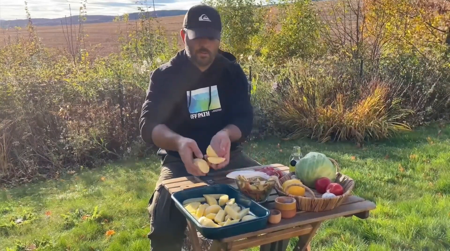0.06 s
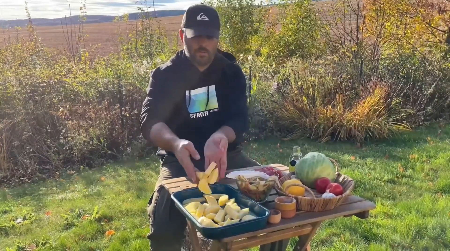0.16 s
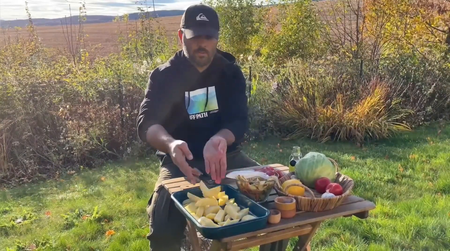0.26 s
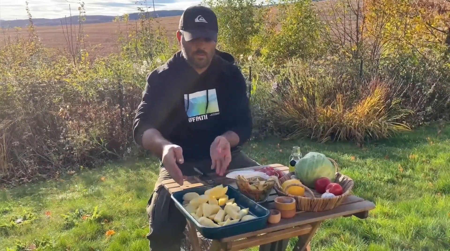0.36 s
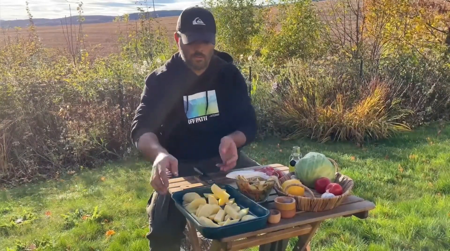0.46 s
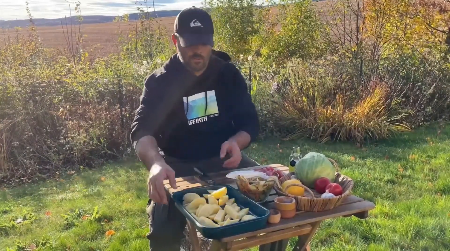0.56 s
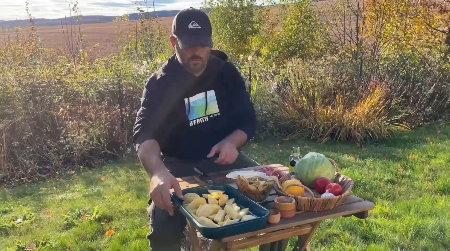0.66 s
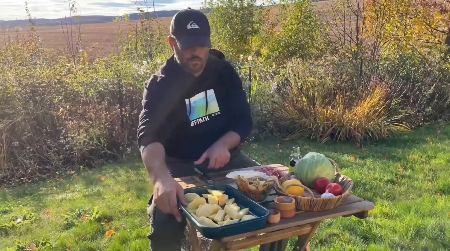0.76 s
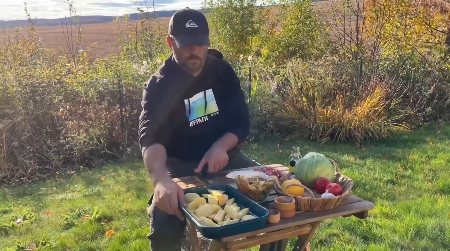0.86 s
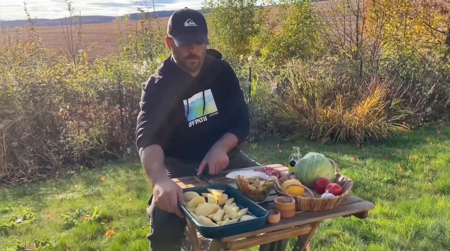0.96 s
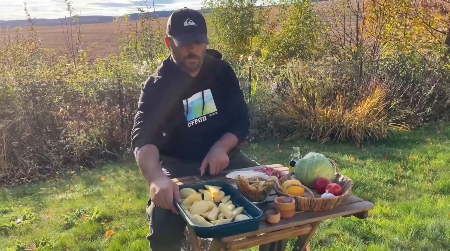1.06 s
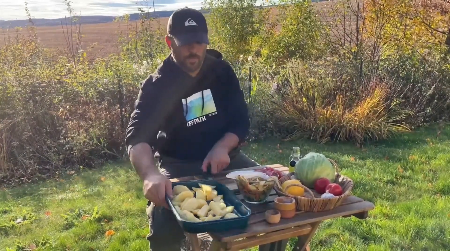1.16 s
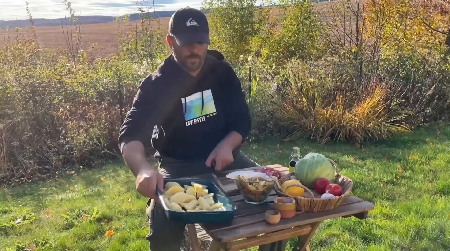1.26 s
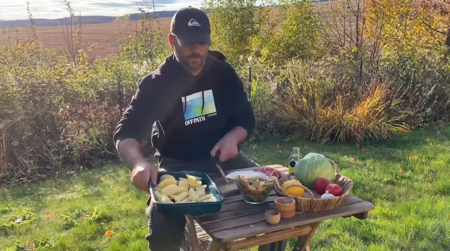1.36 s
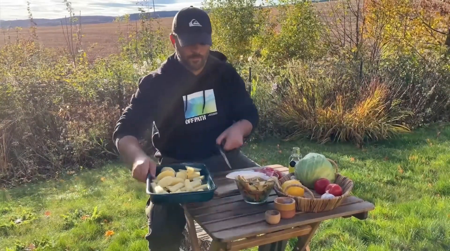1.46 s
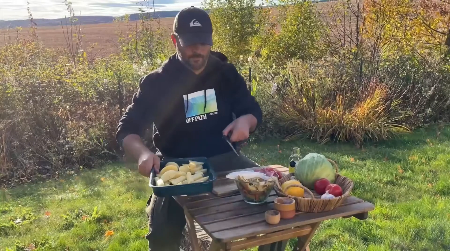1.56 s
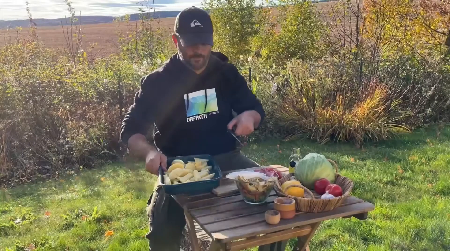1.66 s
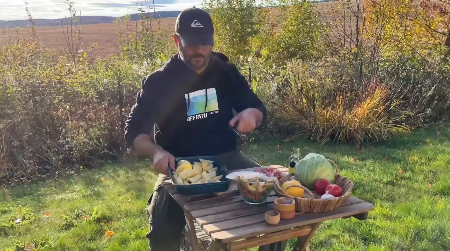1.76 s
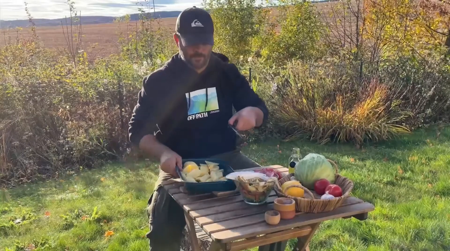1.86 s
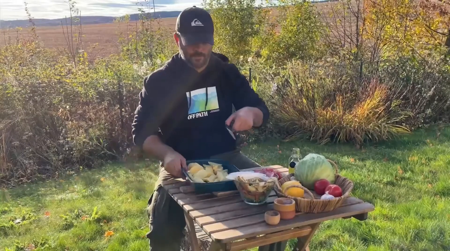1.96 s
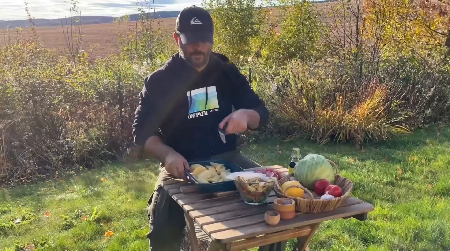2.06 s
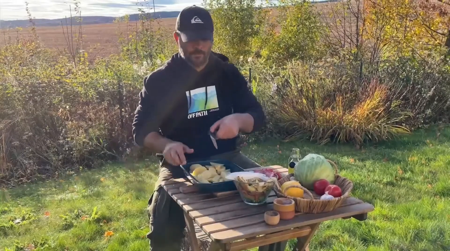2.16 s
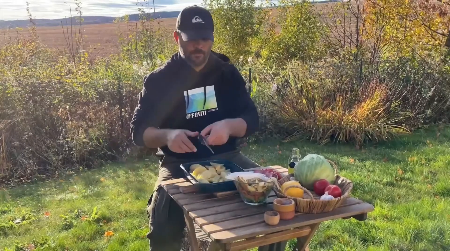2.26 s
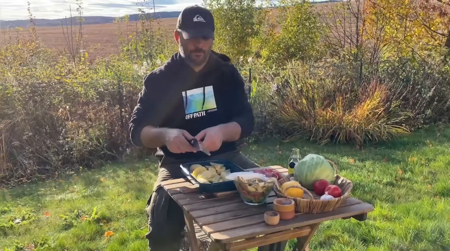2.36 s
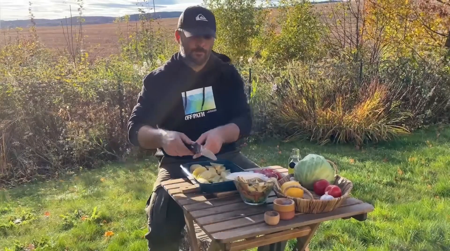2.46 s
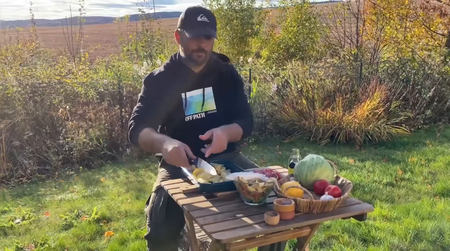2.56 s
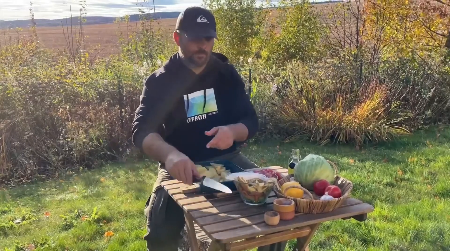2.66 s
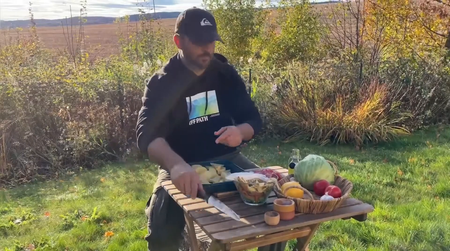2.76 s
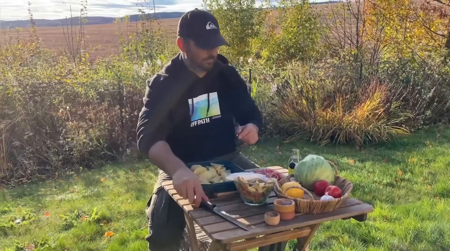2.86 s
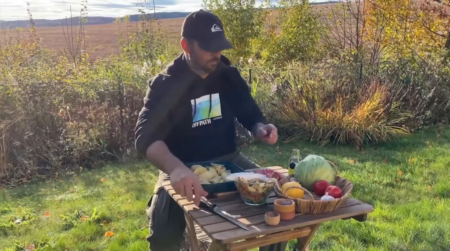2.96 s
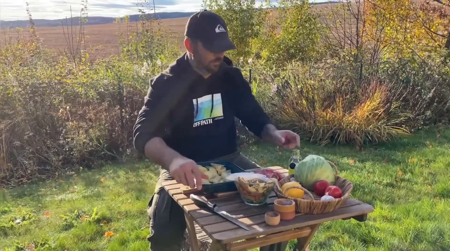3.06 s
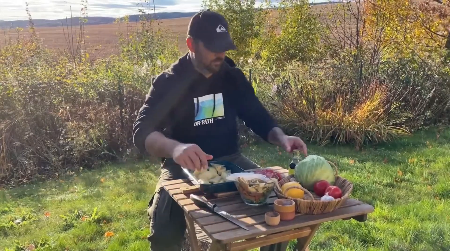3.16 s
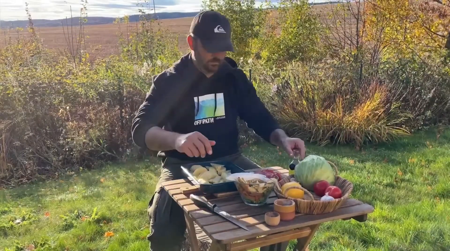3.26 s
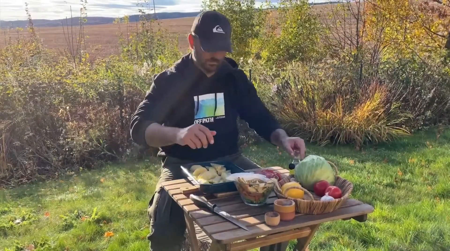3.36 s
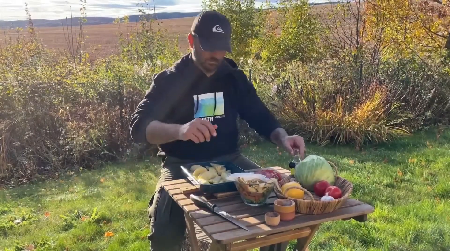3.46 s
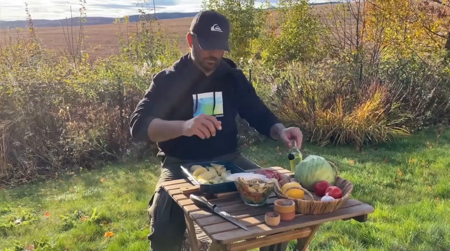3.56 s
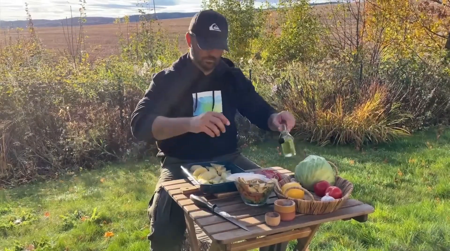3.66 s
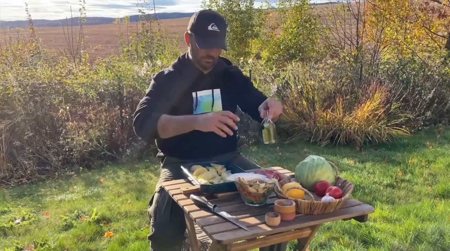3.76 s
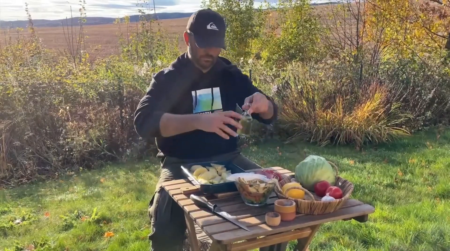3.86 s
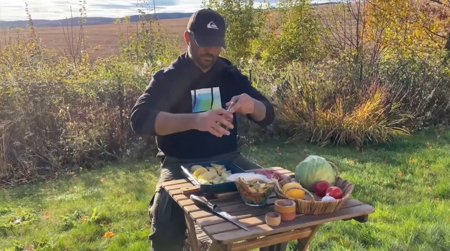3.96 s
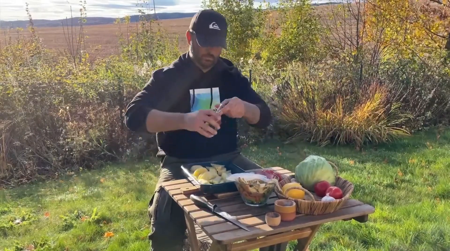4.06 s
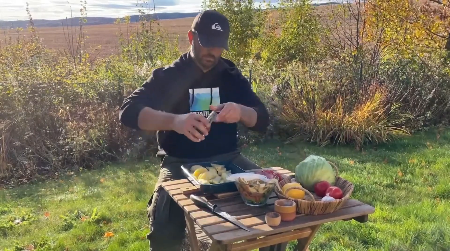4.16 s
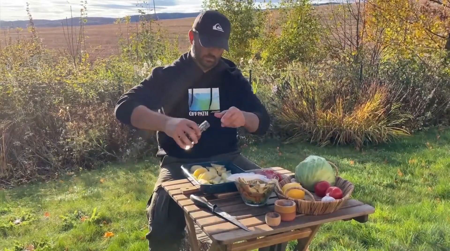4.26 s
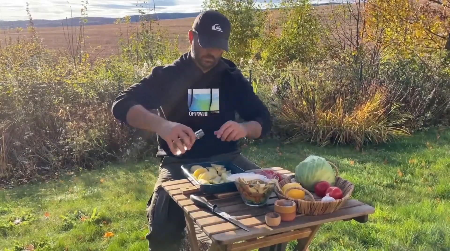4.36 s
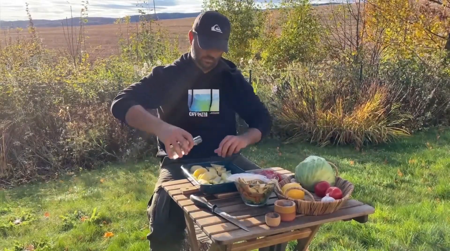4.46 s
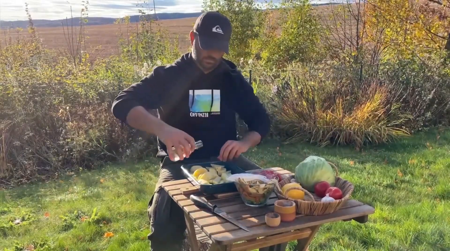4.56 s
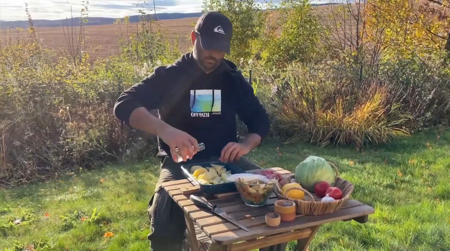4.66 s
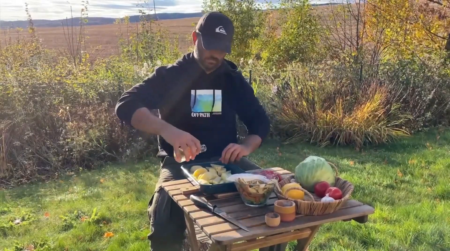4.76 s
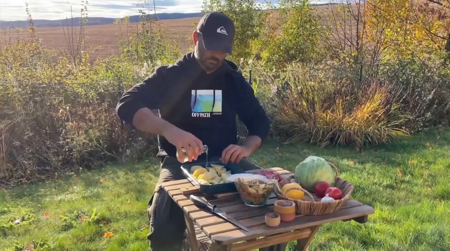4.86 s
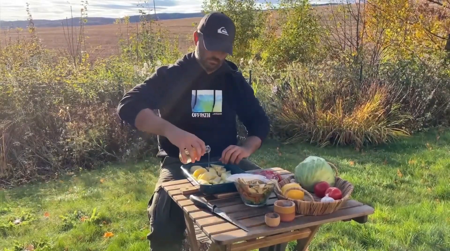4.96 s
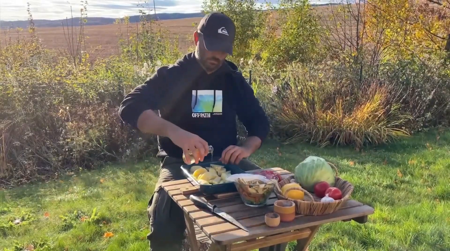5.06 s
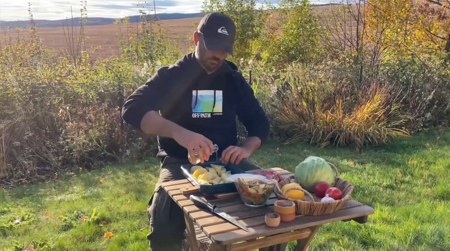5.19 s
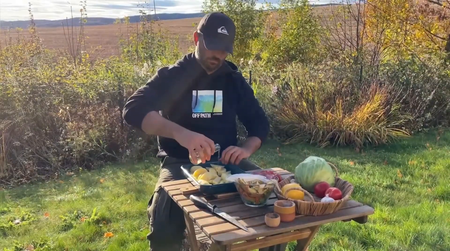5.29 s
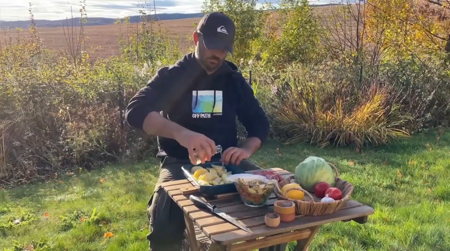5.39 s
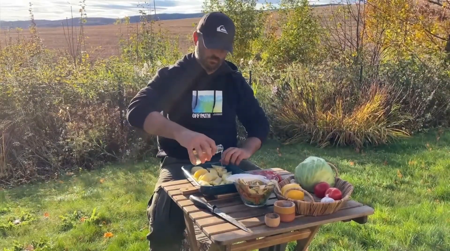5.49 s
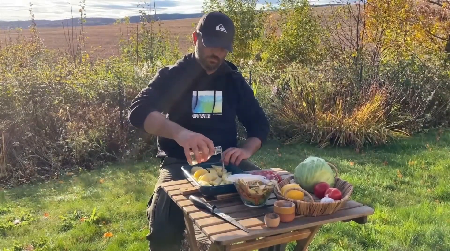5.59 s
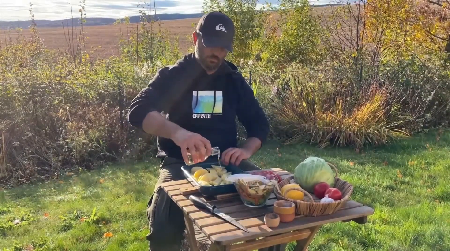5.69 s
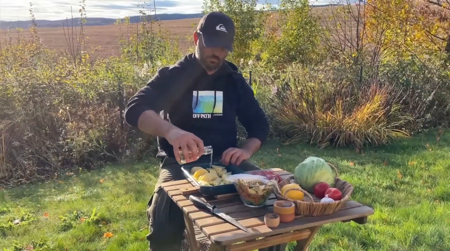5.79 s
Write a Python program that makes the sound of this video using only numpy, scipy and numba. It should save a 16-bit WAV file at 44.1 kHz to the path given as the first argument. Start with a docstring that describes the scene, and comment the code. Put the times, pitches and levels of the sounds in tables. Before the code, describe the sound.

For the first 0.8 seconds, damp potato pieces tumble into a baking tray with soft, dull thuds and a little wet rubbing. Around 1 second there is a faint swish with tiny thin squeaks, followed by light handling bumps. At about 1.75 seconds the loaded tray lands on a wooden table with a short clatter and a slight scrape. Near 2.8 seconds a knife is laid on the wood with a few sharp clicks and rocks softly to rest. Muffled bumps of hands and sleeves continue until about 4 seconds. At 4.6 seconds a hand comes down on the table with a low, dull knock. A small bottle cap clicks and rings briefly at 5.35 seconds, and a few soft bumps follow. Everything is close and outdoors, over a faint, wide hiss and a light rumble of air on the microphone.

```python
"""Potato pieces tumble softly into a baking tray, close up on a slatted wooden table in a quiet garden.
After a faint swish the tray is set down with a clatter; a knife is laid on the wood and rocks to rest.
Later a hand lands with a dull knock and a small bottle cap clicks. Hard contacts ring each object's
modes, soft ones thud for a few cycles, and scrapes are grainy noise. Handling bumps, a light air
rumble and a faint hiss lie under it all, heard through a two-port microphone."""
import sys
import numpy as np
from scipy import signal
from scipy.fft import rfft, irfft
from scipy.io import wavfile
from numba import njit

SR = 44100
rng = np.random.default_rng(int(sys.argv[2]) if len(sys.argv) > 2 else 0)


def dump_mix(stems):
    """Bounce the given channels to the path in sys.argv[1] as a 16-bit WAV at rate SR."""
    frames = np.atleast_2d(stems).T  # one column per channel
    limited = np.clip(frames, -1, 1)  # hard clip at full scale
    pcm = np.round(limited * 32767).astype(np.int16)
    wavfile.write(sys.argv[1], SR, pcm)


N = 257103
TIME = np.arange(N) / SR

# Soft bumps of hands and arms, and two low thumps as the tray lands (1.845 and 1.874 s). Each row: time in
# seconds, relative peak in dB, pitch in Hz.
BUMPS = [(0.866, -55, 300), (0.96, -53, 260), (1.069, -55, 340), (1.142, -46, 316), (1.177, -52, 269),
         (1.26, -48, 260), (1.28, -47, 263), (1.472, -49, 202), (1.49, -46, 280), (1.519, -41, 265),
         (1.593, -50, 300), (1.609, -49, 300), (1.62, -52, 240), (1.845, -32.5, 240), (1.874, -31.5, 240),
         (1.992, -33, 164), (2.027, -33.5, 164), (2.119, -46.5, 185.7), (2.204, -48.5, 214),
         (2.404, -34.5, 129.6), (2.939, -38, 127.6), (3.044, -34, 131.2), (3.269, -37, 157.3),
         (3.473, -36.5, 120.6), (3.51, -41, 149), (3.581, -39.5, 152.5), (3.704, -41, 261.2),
         (3.777, -47, 271), (4.098, -45, 219), (5.021, -42.5, 75.4), (5.135, -42, 84), (5.314, -39, 91),
         (5.532, -33, 227.7), (5.574, -46, 230), (5.655, -32.5, 169.3), (5.673, -37, 170),
         (5.789, -37, 149)]


def potatoes():
    """Damp pieces thud on each other, rub and jostle as they tumble, and slither on their wet cut faces."""
    # Landings. Each row: time in seconds, relative peak in dB, pitch in Hz.
    landings = [(0.012, -40, 520), (0.017, -41, 470), (0.024, -39, 350), (0.045, -37.5, 400),
                (0.096, -45, 380), (0.113, -41, 440), (0.127, -40.5, 320), (0.137, -43, 480),
                (0.149, -43, 330), (0.157, -38, 600), (0.163, -37, 480), (0.173, -32, 600),
                (0.184, -31, 500), (0.193, -39, 460), (0.206, -45, 560), (0.216, -44, 520),
                (0.242, -45, 540), (0.305, -38, 430), (0.319, -40, 520), (0.327, -34, 530),
                (0.367, -43, 400), (0.401, -40, 360), (0.459, -46.5, 480), (0.474, -43, 480),
                (0.484, -44, 470), (0.531, -47, 460), (0.551, -45, 460), (0.586, -51, 430),
                (0.66, -45, 370), (0.675, -49, 420), (0.706, -45, 500), (0.714, -38, 490), (0.73, -44, 460),
                (0.738, -38, 480), (0.746, -45, 480), (0.765, -42, 410)]
    # Spells of tumbling and of slipping. Each row: start and length in seconds, relative level in dB.
    tumbles = [(0.005, 0.0286, -52.5), (0.09, 0.046, -55.5), (0.155, 0.0622, -52), (0.305, 0.0293, -55),
               (0.465, 0.078, -57.5), (0.7, 0.06, -55)]
    slips = [(0.196, 0.025, -62.5), (0.28, 0.016, -64), (0.68, 0.05, -71)]
    # Tone of the dull rub and the wet slip. Each row: frequency in Hz, relative level in dB.
    rub_colour = [(170, -15), (320, 9.5), (550, 4.5), (850, -8), (1300, -26), (2300, -16.5), (6000, -34.5)]
    slip_colour = [(500, 3), (1100, 2), (1700, -6), (2600, -5), (4000, -15), (7000, -23)]
    thuds = from_db(-0.2) * soft_bumps(landings, cycles=0.85)
    rubbing = from_db(-4) * noise(rub_colour) * flicker(rate=170, depth_db=2.5)
    nudges = from_db(-6) * jostle(count=350, hz=429, spread_octaves=0.2, spread_db=3, cycles=0.91)
    wet_grain = noise(slip_colour) * flicker(rate=400, depth_db=3)
    slither = swells(slips, attack_s=0.02, release_s=0.05) * wet_grain
    return thuds + slither + swells(tumbles, attack_s=0.029, release_s=0.0688) * (rubbing + nudges)


def tray():
    """The loaded tray lands on one edge, drops onto the other and settles with a chatter of its rim."""
    # Contacts. Each row: start in seconds, strength in dB, brightness in Hz.
    body_hits = [(1.73573, 1.2, 9000), (1.73801, -11.6, 2600), (1.74213, -6.6, 1500), (1.7519, -19.9, 1300),
                 (1.8338, -10, 3300), (1.8405, -8, 810), (1.8535, -23, 2500), (1.8712, -12, 1300),
                 (1.9905, -33, 5000)]
    rim_hits = [(1.834, -2.5, 4000), (1.8368, -6, 3500), (1.8538, -8, 5000), (1.8728, -6, 3000)]
    # Main modes. Each row: frequency in Hz, relative level in dB, seconds to fade by 60 dB.
    body_modes = [(256, -33, 0.1), (318, -38, 0.08), (425, -29.5, 0.065), (515, -25.5, 0.075),
                  (581, -36, 0.06), (877, -36, 0.06), (970, -37, 0.05), (1061, -34, 0.055),
                  (1427, -26.5, 0.04), (1595, -20, 0.047), (1755, -30, 0.045), (1927, -28, 0.05),
                  (2013, -35, 0.07), (2218, -33, 0.06), (2335, -32, 0.066), (2752, -31, 0.029),
                  (2864, -43, 0.09), (3001, -28, 0.03), (3453, -33, 0.028), (4447, -34, 0.033),
                  (4900, -37, 0.028), (6000, -48, 0.075), (6940, -42, 0.023)]
    rim_modes = [(1190, -36, 0.04), (2480, -42, 0.11), (2800, -32, 0.025), (3130, -34, 0.025),
                 (3500, -35, 0.022), (3780, -41, 0.02)]
    # The crack of dense, short-lived modes. Each row: frequency in Hz, relative level in dB.
    body_crack = [(120, -22), (300, -4), (1000, -1.5), (2200, -2), (3800, -14), (7000, -19.5), (11500, -25)]
    rim_crack = [(1200, -14), (2600, 0), (3700, -1), (4400, -14), (6000, -24)]
    body = struck(body_hits, body_modes, body_crack,
                  crack_db=-20.5, crack_t60=0.043, damping=0.38, rise_s=0.0004, spread_db=0.6)
    rim = struck(rim_hits, rim_modes, rim_crack,
                 crack_db=-29, crack_t60=0.022, damping=0.2, rise_s=0.0005, spread_db=2.0)
    return body + rim


def knife():
    """The blade ticks on the wood, the handle rings the table, and the knife rocks softly to rest."""
    # Contacts. Each row: start in seconds, strength in dB, brightness in Hz.
    blade_hits = [(2.7558, 2.3, 14000), (2.7635, -10, 5000), (2.8188, -2, 10000), (2.8655, -14, 10000)]
    handle_hits = [(2.7605, -28, 1700), (2.79939, -2.5, 11000), (2.8029, -2.3, 7000), (2.81821, -13, 2200),
                   (2.868, -28, 2000), (2.907, -41, 1200), (2.966, -38, 1900)]
    # Main modes. Each row: frequency in Hz, relative level in dB, seconds to fade by 60 dB.
    blade_modes = [(1733, -53, 0.08), (2090, -43, 0.05), (2730, -46, 0.055), (4480, -42.5, 0.0314),
                   (5196, -46.5, 0.0254), (5950, -45, 0.029), (6785, -50, 0.066), (7275, -41, 0.026),
                   (10550, -43, 0.016)]
    table_modes = [(282, -36, 0.09), (543, -32, 0.074), (676, -20, 0.095), (727, -27, 0.06),
                   (797, -35, 0.08), (990, -26, 0.085), (1285, -28, 0.08), (1435, -30, 0.045),
                   (1520, -23, 0.065), (1784, -29, 0.08), (1870, -28, 0.042), (2072, -27, 0.062),
                   (2191, -34, 0.05), (2350, -28, 0.05), (2542, -30, 0.048), (2707, -24, 0.045),
                   (3064, -22, 0.028), (3255, -20, 0.052), (4110, -29, 0.048), (4250, -37, 0.036),
                   (4610, -37, 0.05), (6405, -31, 0.025), (6560, -39, 0.033)]
    # The crack of dense modes. Each row: frequency in Hz, relative level in dB.
    blade_crack = [(300, -17), (2000, -8), (5000, 0), (8500, -3), (11500, 0)]
    table_crack = [(100, -14), (280, -4), (550, -2), (1500, -1), (3200, 0.5), (4000, -9), (7000, -20),
                   (11500, -26)]
    # The knife sings faintly as it rocks. Each row: time in seconds, peak in dB.
    rocking = [(2.765, -49), (2.873, -44), (2.912, -50), (2.939, -58), (2.971, -50), (2.99, -58)]
    rocking_hz = 850
    blade = struck(blade_hits, blade_modes, blade_crack,
                   crack_db=-30, crack_t60=0.045, damping=0.4, rise_s=0.0005, spread_db=1.5)
    handle = struck(handle_hits, table_modes, table_crack,
                    crack_db=-18.5, crack_t60=0.056, damping=0.27, rise_s=0.0004, spread_db=0.5)
    bounces = soft_bumps([(s, db, rocking_hz) for s, db in rocking], cycles=6.5)
    return blade + handle + bounces


def dull_knock():
    """A hand comes down on the table: a soft, uneven push that leaves its lowest modes shaking."""
    # Contacts. Each row: start in seconds, strength in dB, brightness in Hz.
    hits = [(4.555, -6.5, 2500), (4.572, -5, 1300), (4.60, -3, 200), (4.668, -11, 130), (4.708, -11, 150),
            (4.78, -18, 150)]
    # Table modes. Each row: frequency in Hz, relative level in dB, seconds to fade by 60 dB.
    modes = [(68.75, -43, 0.3), (92, -30, 0.166), (117, -26, 0.191), (205.6, -32, 0.11),
             (243.3, -31, 0.108), (300.5, -34, 0.096), (1225, -47, 0.11), (1813.5, -47.5, 0.055)]
    # The thump of dense modes. Each row: frequency in Hz, relative level in dB.
    thump = [(40, -7.5), (110, -3.5), (300, -19.5), (600, -39), (1200, -13), (2000, -27.5), (3500, -33.5),
             (9000, -70.5)]
    # The heel of the hand presses home. Each row: time in seconds, relative peak in dB, pitch in Hz.
    press = [(4.579, -23.5, 139.6), (4.6, -22, 112.7), (4.623, -27.5, 120), (4.644, -24, 96.7)]
    shake = struck(hits, modes, thump,
                   crack_db=-35.5, crack_t60=0.114, damping=0.22, rise_s=0.00284, spread_db=2.37)
    return shake + from_db(-1) * soft_bumps(press, cycles=0.874)


def bottle_cap():
    """A small hard cap chatters on the table and rings briefly."""
    # Contacts. Each row: start in seconds, strength in dB, brightness in Hz.
    hits = [(5.34275, 0.7, 12000), (5.34525, -7.6, 9100), (5.35317, -1.6, 11900), (5.35979, -15.6, 7020)]
    # Main modes. Each row: frequency in Hz, relative level in dB, seconds to fade by 60 dB.
    modes = [(264, -43, 0.079), (522, -33.5, 0.074), (720, -37, 0.06), (850, -42, 0.111),
             (946, -33.5, 0.066), (1273, -37, 0.041), (1722, -43, 0.098), (1927, -31, 0.042),
             (2330, -39, 0.03), (2872, -46, 0.196), (3550, -47, 0.047), (4290, -44.5, 0.12),
             (5978, -37, 0.059), (6520, -40, 0.051), (7900, -34, 0.035), (10700, -40, 0.045)]
    # The click of dense modes. Each row: frequency in Hz, relative level in dB.
    click = [(150, -12), (700, -6), (2200, -1), (4000, -8), (8000, -5.5), (11500, -6)]
    return struck(hits, modes, click,
                  crack_db=-29.5, crack_t60=0.072, damping=0.15, rise_s=0.0007, spread_db=0.6)


def sliding():
    """Tray and knife scrape a little on the slats as they are put down."""
    # Slides. Each row: start and length in seconds, level in dB.
    slides = [(1.76, 0.025, -60), (1.806, 0.024, -51), (1.83, 0.035, -53), (1.885, 0.015, -57),
              (2.765, 0.02, -53.5), (2.788, 0.047, -49), (2.87, 0.02, -59)]
    # Tone of the scrape. Each row: frequency in Hz, relative level in dB.
    colour = [(150, -4.5), (500, 1.5), (1500, -3), (2600, -2), (3800, -9.5), (5500, -21), (11000, -27.5)]
    return swells(slides, attack_s=0.017, release_s=0.08) * noise(colour) * flicker(rate=310, depth_db=2)


def swish():
    """A faint, grainy, breath-like swish just before the tray is set down."""
    # Swishes. Each row: start and length in seconds, level in dB.
    swishes = [(0.855, 0.04, -66), (0.905, 0.045, -59.5), (0.97, 0.08, -61)]
    # Tone of the swish. Each row: frequency in Hz, relative level in dB.
    colour = [(300, -3), (500, -5), (830, 2), (1400, -4), (2400, -3), (3300, -4), (3800, -16), (4600, -12),
              (7000, -24)]
    return swells(swishes, attack_s=0.04, release_s=0.05) * noise(colour) * flicker(rate=350, depth_db=3)


def squeaks():
    """Each thin squeak swells and fades while its pitch bends through an arc, wavering slightly."""
    # Squeaks. Each row: start and length in seconds, peak in dB, first, middle and last pitch in Hz.
    glides = [(0.875, 0.095, -60.5, 3280, 3480, 3150), (0.98, 0.08, -65, 3150, 2900, 2550),
              (3.185, 0.06, -69, 3750, 3250, 2950)]
    out = np.zeros(N)
    for s, length, db, *arc_hz in glides:
        progress = np.linspace(0, 1, int(length * SR))
        arc = np.polyval(np.polyfit([0, .5, 1], arc_hz, 2), progress)
        hz = arc * flicker(rate=700, depth_db=0.22)[:len(progress)]
        add(out, s, from_db(db) * np.sin(np.pi * progress) * np.sin(2 * np.pi * np.cumsum(hz) / SR))
    return out


def handling():
    """Hands and arms bump softly; sleeves rustle and brush dully while they move."""
    # Arm moves. Each row: start and length in seconds, relative level in dB.
    moves = [(0.93, 0.035, -65), (1.16, 0.04, -65), (1.255, 0.03, -64), (1.47, 0.0516, -60),
             (1.585, 0.04, -63), (1.98, 0.0474, -47), (2.1, 1.608, -65.5), (5.44, 0.043, -51),
             (5.625, 0.085, -50), (5.77, 0.067, -52.5)]
    # Tone of the sleeves. Each row: frequency in Hz, relative level in dB.
    colour = [(90, 3), (160, -4), (280, -2.5), (450, -12), (800, -26.5), (2000, -41.5)]
    rustle = from_db(-1.5) * noise(colour) * flicker(rate=100, depth_db=1)
    brushes = from_db(-3) * jostle(count=120, hz=178.7, spread_octaves=0.341, spread_db=3, cycles=1.111)
    cloth = swells(moves, attack_s=0.039, release_s=0.0473) * (rustle + brushes)
    return from_db(-2.5) * soft_bumps(BUMPS, cycles=1.066) + cloth


def air():
    """Air stirs at the microphone, partly different at each port: gusts, and a puff with each bump."""
    # Gusts. Each row: start and length in seconds, relative level in dB, seconds to fade by 20 dB.
    stirs = [(1.852, 0.029, -55, 0.02), (1.899, 1.724, -58.5, 0.01), (2.808, 0.0127, -39.5, 0.035),
             (4.569, 0.0367, -36, 0.3029), (4.8, 1.04, -54.5, 1.86)]
    # Tone of the rumble. Each row: frequency in Hz, relative level in dB.
    colour = [(25, -11), (55, 5.5), (110, 5.5), (200, -4.5), (400, -23.5), (800, -59.5)]
    puff_s, puff_db = 0.0126, -15
    gusts = sum(swells([(s, length, db)], attack_s=0.0326, release_s=fade_s)
                for s, length, db, fade_s in stirs)
    puffs = swells([(s, puff_s, db + puff_db) for s, db, _ in BUMPS], attack_s=0.049, release_s=0.06)
    rumble = stereo(from_db(-6.5) * noise(colour), from_db(-10.5) * noise(colour))
    return np.hypot(gusts, puffs) * rumble


def background_hiss():
    """A wide, faint background hiss that wavers slightly, with a treble dip in the centre."""
    # Tone of the hiss, in the centre and at the sides. Each row: frequency in Hz, relative level in dB.
    mid_colour = [(120, -10), (230, -2), (400, -4), (750, -8), (1000, -11.5), (1300, -18.5), (1700, -16.5),
                  (2300, -12.8), (3300, -16.5), (4700, -16), (5700, -19), (6800, -20), (8500, -34),
                  (10800, -21), (12000, -27)]
    side_colour = [(120, -12), (300, -4.5), (700, 3), (1100, -1), (1600, -12), (2300, -22.5), (3200, -13.5),
                   (4700, -19.5), (8500, -14), (11000, -17.5), (12000, -28.5)]
    mid = from_db(-64.5) * noise(mid_colour) * flicker(rate=14, depth_db=0.45)
    side = from_db(-60.5) * noise(side_colour) * flicker(rate=9, depth_db=0.6)
    return stereo(mid, side)


def scattered(x, db, t60):
    """Bowls and slats throw back a short spray of echoes, mostly treble, opposite at the two ports."""
    # Tone of the echoes. Each row: frequency in Hz, relative level in dB.
    colour = [(80, -10), (400, -2), (1000, -5), (3000, 5), (12000, 2.5)]
    t = TIME[:SR // 8]
    echoes = noise(colour, size=len(t)) * from_db(-60 * t / t60)
    side = signal.fftconvolve(x, echoes / np.linalg.norm(echoes))[:N]
    return stereo(0, from_db(db) * side)


def ports(x):
    """The two ports hear the table with differences of phase and level, mostly in the treble."""
    # Phase between the ports. Each row: frequency in Hz, lead of the left in radians.
    phase = [(100, 0.35), (1800, 0.4), (3500, 0.9), (5200, 0.7), (5800, -0.8), (6500, -1.2), (7500, -2.3),
             (9000, -3.4), (10300, -4.6), (12200, -5.7)]
    # Balance of the ports. Each row: frequency in Hz, left over right in dB.
    balance = [(100, -0.5), (1200, 0.3), (2500, 1.3), (4500, 3.5), (8000, -1.5), (12000, 0)]
    hz = np.fft.rfftfreq(N, 1 / SR)
    half = from_db(at_hz(balance, hz) / 2) * np.exp(.5j * at_hz(phase, hz))
    return irfft(rfft(x) * np.array([half, 1 / half]), N)


def struck(hits, modes, crack, crack_db, crack_t60, damping, rise_s, spread_db):
    """Each contact rings the main modes, with strengths of its own, and a burst of dense ones."""
    out, t = np.zeros(N), TIME[:16384]
    hz, db, t60 = np.transpose(modes)[:, :, None]
    rings = from_db(db - 60 * t / t60) * np.sin(2 * np.pi * hz * t)
    for s, strength_db, bright_hz in hits:
        strengths = from_db(spread_db * rng.standard_normal(len(modes))) * (-1) ** np.arange(len(modes))
        blow = strengths @ rings + from_db(crack_db) * dying_burst(crack, t, crack_t60, damping)
        add(out, s, from_db(strength_db) * lowpass(blow * (1 - np.exp(-t / rise_s)), bright_hz))
    return out


def dying_burst(colour, t, t60, damping):
    """Dense modes as noise that dies octave by octave: t60 holds at 1 kHz, and the treble goes first."""
    octaves = 125 * 2.0 ** np.arange(8)
    place = np.log2(np.clip(np.fft.rfftfreq(len(t), 1 / SR), octaves[0], octaves[-1]))
    shares = np.maximum(1 - abs(place - np.log2(octaves)[:, None]), 0)
    bands = irfft(rfft(noise(colour, size=len(t))) * shares, len(t))
    band_t60 = t60 * (octaves[:, None] / 1000) ** -damping
    return np.sum(bands * from_db(-60 * t / band_t60), axis=0)


def soft_bumps(rows, cycles):
    """A yielding contact swells over the given number of cycles, peaks at its time and dies away."""
    out, t = np.zeros(N), TIME[:SR // 4]
    for s, db, hz in rows:
        swell = cycles / hz
        shape = (t / swell * np.exp(1 - t / swell)) ** 3
        add(out, s - swell, from_db(db) * shape * np.sin(2 * np.pi * (hz * t + rng.random())))
    return out


def jostle(count, hz, spread_octaves, spread_db, cycles):
    """Many slight contacts at random moments, differing in strength and pitch; unit rms."""
    strength, pitch = rng.standard_normal((count, 2)).T
    moments = (np.arange(count) + rng.random(count)) * TIME[-1] / count
    contacts = zip(moments, spread_db * strength, hz * 2 ** (spread_octaves * pitch))
    return rms_one(soft_bumps(contacts, cycles))


def swells(rows, attack_s, release_s):
    """An envelope in which each row rises, holds and fades, 20 dB per attack or release time."""
    power = np.zeros(N)
    for s, length, db in rows:
        outside = np.maximum(s - TIME, 0) / attack_s + np.maximum(TIME - s - length, 0) / release_s
        power += from_db(db - 20 * np.minimum(outside, 10)) ** 2
    return np.sqrt(power)


def noise(colour, size=N):
    """Noise of unit rms with the given spectrum, falling away beyond both ends."""
    hz = np.fft.rfftfreq(size, 1 / SR)
    ends = np.minimum(hz / colour[0][0], 1) ** 2 / np.maximum(hz / colour[-1][0], 1) ** 2
    return rms_one(irfft(rfft(rng.standard_normal(size)) * from_db(at_hz(colour, hz)) * ends, size))


def flicker(rate, depth_db):
    """A gain that wanders at random, rate times a second."""
    steps = rng.standard_normal(8192)
    return from_db(depth_db * np.interp(TIME * rate, np.arange(len(steps)), steps))


def lowpass(x, hz):
    """A soft contact cannot excite the high modes."""
    return signal.sosfilt(signal.butter(2, min(hz, .45 * SR), fs=SR, output="sos"), x)


@njit
def low_cut(x, step, dampings):
    """Cascaded two-pole high-passes with a moving corner."""
    out = x.copy()
    for damping in dampings:
        low, band = 0.0, 0.0
        for i in range(len(out)):
            low += step[i] * band
            out[i] -= low + damping * band
            band += step[i] * out[i]
    return out


def from_db(db):
    """Decibels to gain."""
    return 10 ** (np.asarray(db) / 20)


def rms_one(x):
    """Scale to unit rms."""
    return x / np.sqrt(np.mean(x ** 2) + 1e-20)


def at_hz(points, hz):
    """Read a table on a log-frequency axis."""
    freqs, values = np.transpose(points)
    return np.interp(np.log(np.maximum(hz, 1)), np.log(freqs), values)


def add(track, s, sound):
    """Mix a sound in from time s."""
    start = min(max(round(s * SR), 0), N)
    track[start:start + len(sound)] += sound[:N - start]


def stereo(mid, side):
    """Left and right from their common and opposite parts."""
    return np.array([mid + side, mid - side])


def scene():
    """Everything on the table, heard over air rumble and faint hiss."""
    gear = (potatoes() + swish() + squeaks() + tray() + knife() + sliding()
            + bottle_cap() + dull_knock() + handling())
    return ports(gear) + scattered(gear, db=-14.5, t60=0.0304) + air() + background_hiss()


def record(dry):
    """The bass thins and returns; the top is cut steeply."""
    # The moving edge of the bass. Each row: time in seconds, low-cut corner in Hz.
    low_edge = [(0, 186), (0.25, 295), (0.8, 292.5), (1.0, 198), (1.74, 149.4), (1.85, 110), (2.05, 62),
                (3.66, 44.6), (3.76, 157.7), (4.48, 130), (4.55, 34.4)]
    top_hz = 12100
    step = 2 * np.pi * np.interp(TIME, *np.transpose(low_edge)) / SR
    dampings = 2 * np.cos(np.pi * np.array([1, 3, 5, 7]) / 16)  # eight poles, flat above the corner
    thinned = np.array([low_cut(channel, step, dampings) for channel in dry])
    return signal.sosfilt(signal.ellip(10, .1, 80, top_hz, fs=SR, output="sos"), thinned)


dry = scene()
out = record(dry)
dump_mix(out)
```